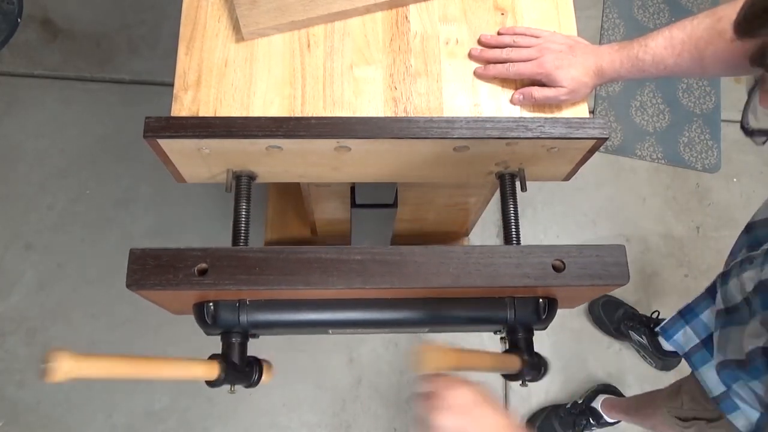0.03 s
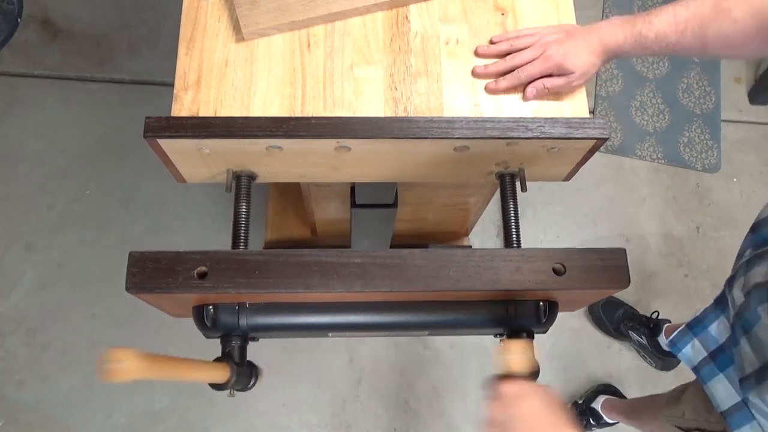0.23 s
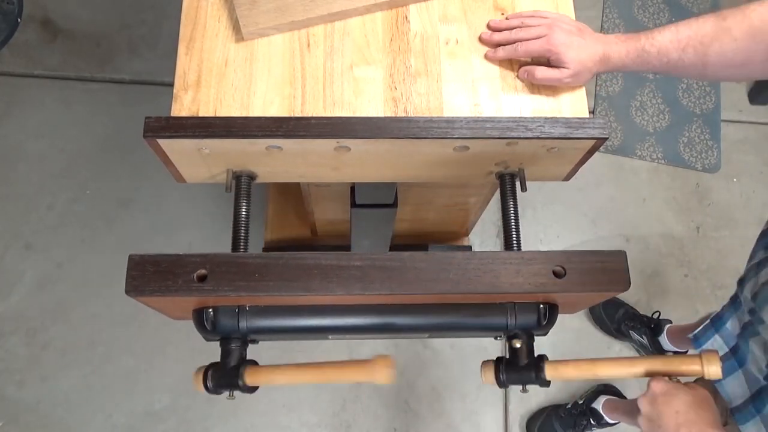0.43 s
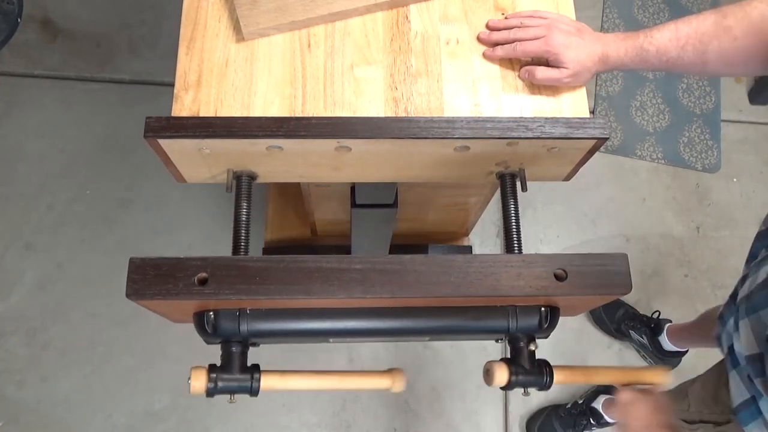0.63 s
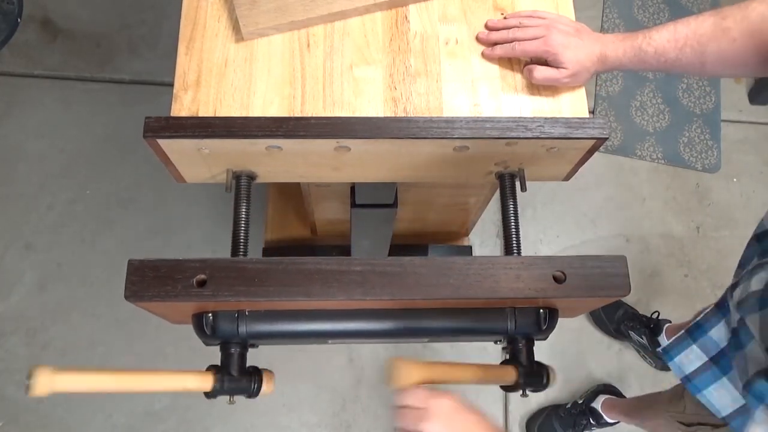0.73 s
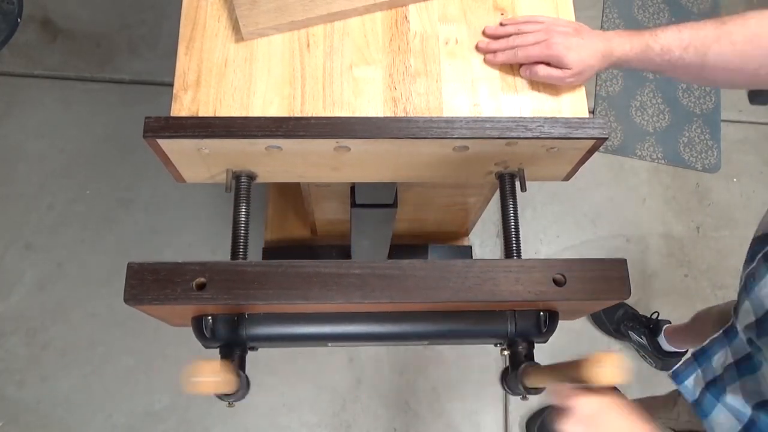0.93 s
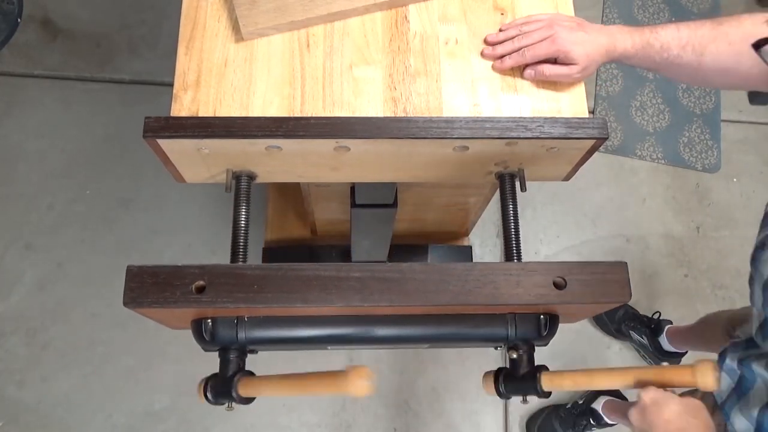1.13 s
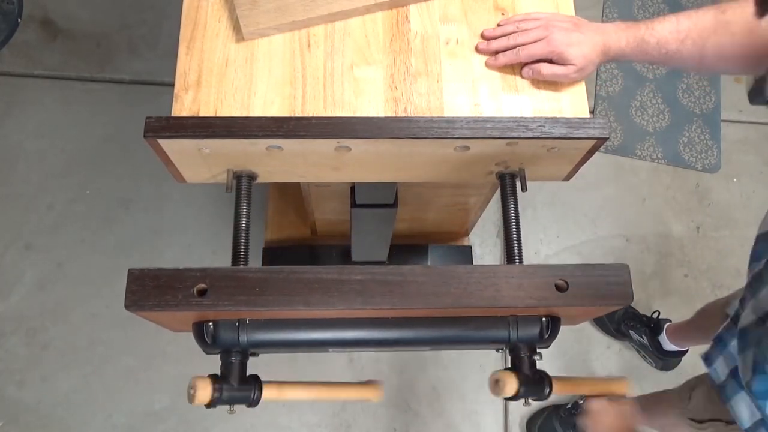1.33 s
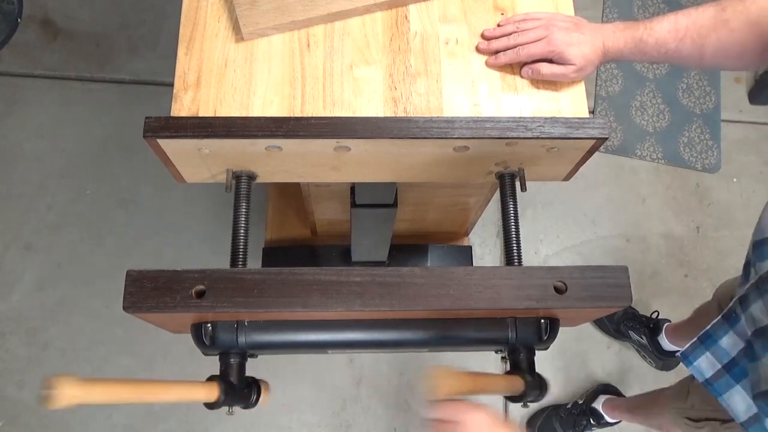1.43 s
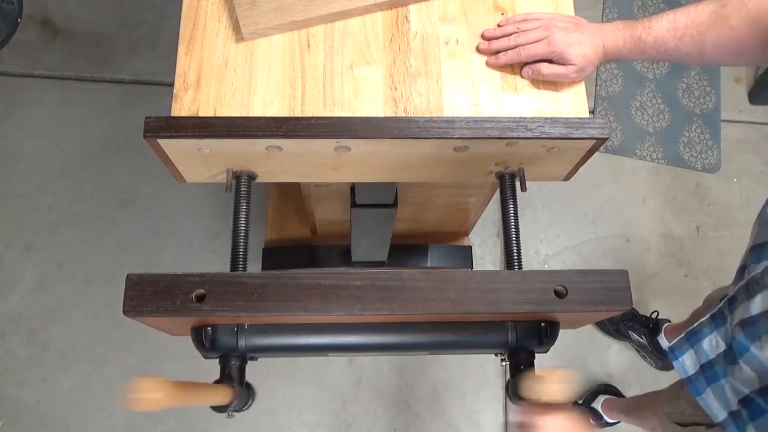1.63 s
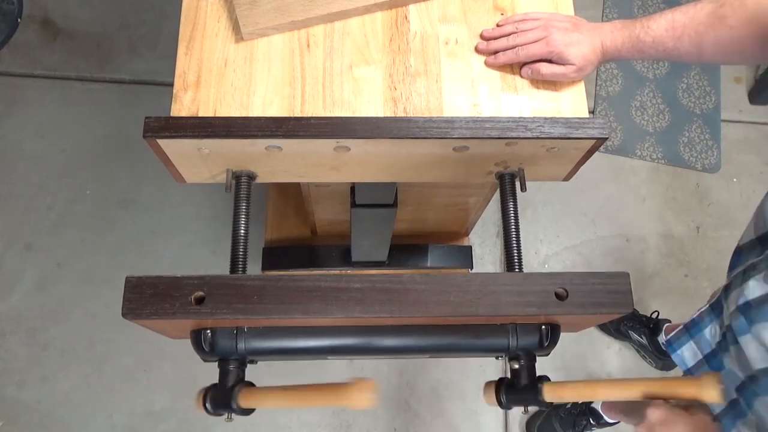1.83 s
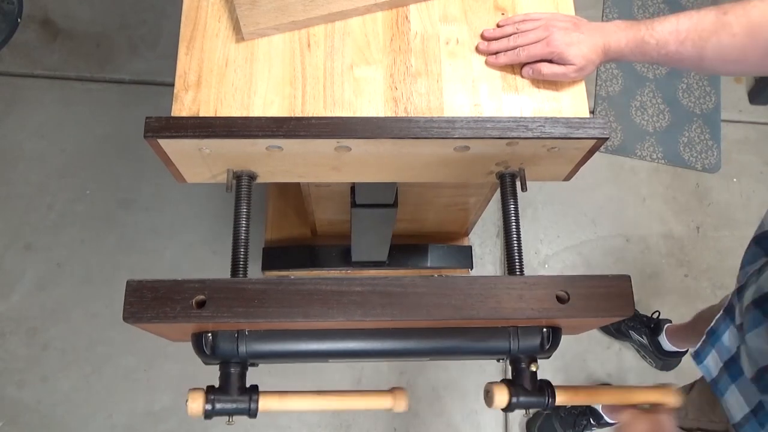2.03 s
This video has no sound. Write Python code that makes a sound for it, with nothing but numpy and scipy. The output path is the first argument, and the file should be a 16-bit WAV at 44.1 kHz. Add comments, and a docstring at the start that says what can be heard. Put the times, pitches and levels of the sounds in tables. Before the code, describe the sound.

A bench vise is cranked open by hand, screws rubbing, chain pattering, loose wooden handles knocking sharply

```python
"""Steel screws rub and a chain patters; dull bumps and small ticks join in, then loose handles knock sharply.
A twin-screw bench vise with wooden handles is cranked open by hand in a small workshop.
The rubbing is many tiny random slips plus ringing steel; some threads scrape briefly at their own pitch.
Knocks, bumps and ticks are short noise bursts, coloured by the parts that meet and reflected by the room.
Each knock also leaves a handle ringing: a sum of fading sine waves."""
import sys
import numpy as np
from scipy import signal
from scipy.fft import rfft, irfft, next_fast_len
from scipy.io import wavfile
from scipy.ndimage import uniform_filter1d, minimum_filter1d

SR = 44100
rng = np.random.default_rng(int(sys.argv[2]) if len(sys.argv) > 2 else 0)


def wav_out(sig):
    """Save sig, one row per channel (or a flat mono array), as 16-bit PCM at SR to the path in sys.argv[1]."""
    wavfile.write(sys.argv[1], SR, np.round(np.clip(np.atleast_2d(sig).T, -1, 1) * 32767).astype(np.int16))


N = 92610  # length in samples: 2.1 s

# A handle hits its socket. Levels are relative; treble_db applies above about 5 kHz:
# start_s, level_db, fullest_hz, treble_db, rebound_db, room_tail_db, handle (0 or 1)
HANDLE_HITS = [(0.2306, -0.8, 2950, -2, 1, -4.5, 0), (0.4286, -14.5, 2260, -3.5, -4, 2, 1),
               (1.1640, -12, 2740, -10, -2, -1.5, 0), (1.3079, -12, 2900, 12, -7.5, 1.5, 1),
               (1.5804, -10.5, 3200, -5, -11.5, 0, 1), (1.8031, -9.5, 3270, 0, -8.5, 0.5, 1)]
# How strongly chain steel sounds at each pitch: pitch_hz, level_db
CHAIN_TONE = [(300, -29), (2000, -5), (5500, 1), (7300, -5.5), (9200, 3), (11200, -6), (12800, 0),
              (15500, -1.5)]
# How strongly rubbing threads sound at each pitch: pitch_hz, level_db
RUB_TONE = [(30, -7), (140, -37.5), (215, -15), (450, -20.5), (630, -8.5), (880, -10.5), (1150, 5.5),
            (1550, -1), (2900, 1), (4800, -2), (7000, -10.5), (9500, -13), (11500, -16.5), (16000, -16)]
SLIPS_PER_S = 4000  # tiny slips of the threads


def from_db(db):
    """Turn decibels into a gain."""
    return 10 ** (np.asarray(db) / 20)


def rms_one(x):
    """Scale a sound to an average power of 1."""
    return x / np.sqrt(np.mean(x ** 2) + 1e-20)


def unit_energy(x):
    """Scale a short sound to an energy of 1."""
    return x / np.linalg.norm(x)


def level(rows):
    """Turn a curve of (time_s, level_db) into one gain per sample."""
    return from_db(np.interp(np.arange(N) / SR, *np.transpose(rows)))


def bell(f, hz, octaves):
    """A smooth hump around one pitch, 1 at its centre."""
    return np.exp(-.5 * (np.log2(f / hz) / octaves) ** 2)


def colour(x, points, extra=lambda hz: 0):
    """Filter along a (pitch_hz, level_db) curve plus an optional dB law, without any sound before the input."""
    n = 2 * next_fast_len(x.shape[-1])
    hz = np.maximum(np.arange(n // 2 + 1) * SR / n, 1)
    at, db = np.transpose(points)
    gain_db = np.interp(np.log(hz), np.log(at), db) + extra(hz)
    # folding the cepstrum (spectrum of the log gain) forward in time makes the filter minimum-phase
    cepstrum = irfft(np.log(from_db(gain_db)), n)
    cepstrum[1:n // 2] *= 2
    cepstrum[n // 2 + 1:] = 0
    filtered = irfft(rfft(x, n) * np.exp(rfft(cepstrum)), n)
    return filtered[..., :x.shape[-1]]


def burst(t60, rise_s, count=4):
    """Crowded vibration that swells and fades by 60 dB in about t60 seconds, with a nearly even spectrum."""
    t = np.arange(next_fast_len(int(t60 * SR) + 64)) / SR
    shape = from_db(-60 * t / t60) * (1 - np.exp(-t / rise_s)) ** 2
    x = rng.standard_normal(len(t)) * shape
    # in turn, flatten the spectrum and restore the swell and fade
    for _ in range(count):
        x = irfft(np.exp(1j * np.angle(rfft(x))), len(t))
        power = uniform_filter1d(x * x, int(t60 * SR / 10) + 2)
        x = x * shape / np.sqrt(np.abs(power) + 1e-14)
    return unit_energy(x)


def add(track, s, sound):
    """Mix a sound into a track at time s."""
    part = track[..., max(int(s * SR), 0):]
    part[..., :sound.shape[-1]] += sound[..., :part.shape[-1]]


def grains(per_s, spread_db):
    """Tiny impacts at random times, with uneven sizes and random signs."""
    sizes = from_db(spread_db * np.minimum(rng.exponential(1, N), 4))
    happens = rng.random(N) < per_s / SR
    return rms_one(happens * sizes * rng.choice([-1, 1], N))


def contact(x, points, extra=lambda hz: 0, size=4096):
    """A short excitation coloured by the part that it strikes, with room to ring out."""
    return unit_energy(colour(np.pad(x, (0, size)), points, extra))


def workshop(x, wet_db, side_db=0):
    """Direct sound, near reflections and a short, woody tail, as mid and side (centre and stereo difference)."""
    # near reflections from floor and bench, relative to wet_db: delay_s, level_db
    echoes = [(.0042, -10.5), (.009, -13.5), (0.0162, -15.5), (0.0218, -14)]
    warm_db, warm_hz, warm_octaves = 3.5, 2100, 0.33  # the wooden bench colours the reflections
    x = np.pad(x, (0, SR // 3))
    tail, side_tail = (from_db(wet_db) * burst(t60=.18, rise_s=0.0037) for _ in range(2))
    for s, db in echoes:
        add(tail, s, from_db([db + wet_db]))
    warmth = lambda f: warm_db * bell(f, warm_hz, warm_octaves)
    tail = colour(np.pad(tail, (0, SR // 50)), [(warm_hz, -2)], warmth)  # -2 dB at every pitch, plus the hump
    add(side_tail, 0, .5 * burst(t60=0.0027, rise_s=0.00033))
    mid, side = (signal.fftconvolve(x, h)[:len(x)] for h in (tail, side_tail))
    return np.array([x + mid, from_db(side_db) * side])


def stereo(mid, side):
    """A narrow stereo image: the side signal is filtered, then added left and subtracted right."""
    # how much of the side signal is kept at each pitch: pitch_hz, side_gain_db
    width = [(40, -15), (130, -36), (500, -28.5), (1200, -46.5), (2500, -19), (5000, -10), (10000, -13),
             (16000, -19.5)]
    return mid + colour(side, width) * np.array([[1], [-1]])


def room_floor():
    """Faint, mostly low noise of the quiet workshop."""
    noise = rng.standard_normal((2, N))
    rumble = colour(noise, [(25, 6), (100, 4), (250, -19), (1000, -26)])
    return from_db(-82.5) * rms_one(rumble)


def chain_rattle():
    """The running chain's fine patter: many small random impacts with the tone of the steel."""
    # relative strength of the running chain: time_s, level_db
    rattle_level = [(0, -39.5), (.07, -40), (.18, -45.5), (.31, -36), (.36, -51), (.5, -40.5), (.66, -44),
                    (.72, -46), (.97, -50), (1.1, -44), (1.22, -42), (1.36, -41.5), (1.47, -39),
                    (1.59, -48.5), (1.69, -38), (1.87, -46.5), (1.895, -32.5), (1.945, -36), (2.0, -55.5),
                    (2.1, -37.5)]
    impacts = grains(per_s=320, spread_db=5.0)
    patter = rms_one(colour(impacts, CHAIN_TONE)) * level(rattle_level)
    return from_db(-6) * workshop(patter, wet_db=6.0, side_db=2.0)[:, :N]


def screws():
    """Threads slip densely under uneven pressure, which gives a hiss; noise through resonances adds the ring."""
    # relative strength of the screw friction: time_s, level_db
    rub_level = [(0, -40), (.09, -37.5), (.145, -39.5), (.175, -40.5), (.36, -43), (.5, -40.5), (.66, -40),
                 (.83, -39), (.9, -42.5), (1.07, -42), (1.14, -38), (1.27, -42), (1.45, -41), (1.7, -39),
                 (1.79, -42.5), (1.91, -41), (2.02, -42.5), (2.1, -42)]
    # screw resonances: pitch_hz, width_hz, level_db
    screw_modes = [(1196, 72, -4.5), (1990, 160, -9), (2420, 9.6, 3), (2590, 15, -9), (2948, 30, 1.5),
                   (3330, 37, -9), (4665, 42, 0.5)]
    uneven_db, uneven_per_s = 0.5, 34
    knots = rng.standard_normal(1000)
    wander = np.interp(np.arange(N) / SR * uneven_per_s, np.arange(len(knots)), knots)
    pressure = from_db(uneven_db * wander)
    slips = np.array([grains(SLIPS_PER_S, spread_db=1.5) for _ in range(2)])
    hiss = from_db(-0.03) * rms_one(colour(slips, RUB_TONE))
    ring = np.zeros((2, N))
    for hz, width, db in screw_modes:
        resonance = signal.iirpeak(hz, hz / width, fs=SR)
        ring += from_db(db) * signal.lfilter(*resonance, rng.standard_normal((2, N)))
    return level(rub_level) * pressure * (hiss + from_db(-6.5) * rms_one(ring))


def thread_scrapes():
    """A thread catches and scrapes: short runs of slips swell and fade, each around its own pitch."""
    # start_s, length_s, level_db (relative), fullest_hz, width_octaves
    scrapes = [(0.067, 0.028, -42.5, 3200, 0.076), (0.089, 0.032, -43.5, 3900, 0.065),
               (0.118, 0.038, -41.5, 3180, 0.34), (0.141, .025, -47, 2500, 0.2),
               (.812, 0.037, -42.5, 2700, 0.52), (1.122, 0.034, -43, 2580, 1)]
    skirt_db = -16  # far from the fullest pitch
    out = np.zeros((2, N))
    for s, length, db, hz, octaves in scrapes:
        n = int(length * SR)
        slips = grains(SLIPS_PER_S, spread_db=3.0)[:n] * signal.windows.tukey(n, .5)
        scrape = contact(slips, RUB_TONE, lambda f: skirt_db * (1 - bell(f, hz, octaves)))
        # sqrt(n) makes the level independent of the length
        add(out, s, from_db(db) * np.sqrt(n) * workshop(scrape, wet_db=-10, side_db=4))
    return out


def chain_ticks():
    """A chain link snaps onto its sprocket: small steel clicks, each with its own brightest region."""
    # start_s, level_db (relative), brightest_hz, width_octaves
    ticks = [(0.05, -23, 14800, 0.39), (.2735, -18, 8000, 1.2), (0.2937, -10.5, 6170, 1.6),
             (.296, -14.5, 5330, .2), (0.38, -23.5, 10000, 1.1), (0.402, -19, 11900, 0.84),
             (.546, -14.5, 14000, 0.78), (.561, -11.5, 8400, 0.25), (0.644, -12.5, 12000, 0.72),
             (0.753, -24.5, 11900, 1), (.785, -21, 10000, 1.5), (1.026, -21.5, 8000, 1.1),
             (1.124, -23, 14500, 0.36), (1.136, -22, 14400, .3), (1.194, -23, 14000, .5),
             (1.199, -16.5, 13400, 0.93), (1.208, -20, 10900, 0.92), (1.225, -25, 11000, 0.4),
             (1.2559, -17.5, 11100, 0.26), (1.273, -22.5, 13000, 1.1), (1.285, -17, 13500, 0.71),
             (1.538, -22, 5900, 0.91), (1.713, -24, 8900, 0.64), (1.717, -18.5, 8400, 0.35),
             (1.885, -21, 13600, 0.4), (1.9, -26, 12100, 1.1), (2.027, -23.5, 14100, 1.2),
             (2.086, -25, 12700, .7), (2.091, -25, 14600, 0.62)]
    tick_db, skirt_db = 9, -16  # level of all ticks; cut far from the brightest pitch
    out = np.zeros((2, N))
    for s, db, hz, octaves in ticks:
        snap = burst(t60=0.014, rise_s=0.0004)
        tick = contact(snap, CHAIN_TONE, lambda f: skirt_db * (1 - bell(f, hz, octaves)))
        add(out, s, from_db(tick_db + db) * workshop(tick, wet_db=-2.1, side_db=4.5))
    return out


def handle_bumps():
    """The loose handle shifts dully in its socket: soft contacts, each with its own pitch."""
    # start_s, level_db (relative), fullest_hz
    bumps = [(0.0234, -16, 1300), (.046, -13.5, 1180), (.197, -14.5, 1240), (0.2613, -7, 1900),
             (0.285, -11.5, 1950), (1.666, -18.5, 1210), (1.694, -15, 1360), (1.889, -12, 1340),
             (1.892, -19.5, 2160), (1.912, -23, 1400)]
    # tone of a soft contact: pitch_hz, level_db
    bump_tone = [(40, -16), (140, -46), (230, -19), (450, -18.5), (850, -11.5), (1200, -1), (1700, -8.5),
                 (2600, -8.5), (5000, -11), (16000, -23)]
    bump_db, focus_db, focus_octaves = 6.5, 5.5, 0.34
    out = np.zeros((2, N))
    for s, db, hz in bumps:
        push = burst(t60=0.036, rise_s=0.0012)
        bump = contact(push, bump_tone, lambda f: focus_db * bell(f, hz, focus_octaves))
        add(out, s, from_db(bump_db + db) * workshop(bump, wet_db=-1.5))
    return out


def handle_ring():
    """The struck handle rings on after each knock, every vibration mode with a strength of its own."""
    # one list for each handle with its socket: pitch_hz, level_db (relative), t60_s (time to fade by 60 dB)
    handle_modes = [
        [(1150, 3.5, 0.27), (1414, -5, 0.29), (1698, 16, 0.12), (1760, 11, 0.22), (2150, 4.5, 0.21),
         (2404, 13.5, 0.17), (2742, 10, 0.13), (3450, 20.5, 0.044), (4655, 7.5, .14)],
        [(857, -0.5, .12), (1380, 7, .15), (1753, 10, .15), (1815, 4, 0.2), (2240, 11.5, 0.17), (2380, 9, 0.17),
         (2570, 14, 0.073), (2825, 14, 0.11), (3264, 13.5, 0.07), (3475, 18, .04)],
    ]
    ring_db, spread_db = -31.5, 1
    out, t = np.zeros(N), np.arange(SR // 2) / SR
    for s, db, *_, handle in HANDLE_HITS:
        hz, mode_db, t60 = np.transpose(handle_modes[int(handle)])[:, :, None]
        strength_db = mode_db + rng.normal(0, spread_db, hz.shape)
        phase = rng.random(hz.shape)
        modes = from_db(strength_db - 60 * t / t60) * np.sin(2 * np.pi * (hz * t + phase))
        soft_start = 1 - np.exp(-t / .002)
        add(out, s, from_db(ring_db + db) * modes.sum(0) * soft_start)
    return out


def handle_knocks():
    """Each drop of a handle is a hard hit followed at once by a duller rebound."""
    # tone of a hard hit: pitch_hz, level_db
    knock_tone = [(40, -46), (140, -51), (230, -32), (450, -31), (800, -14), (980, -14.5), (1130, -0.5),
                  (1400, 1.5), (1530, -3.5), (1750, 1.5), (3000, 0), (3500, 1), (3850, -4), (5000, -1),
                  (6200, -5.5), (8000, -13), (16000, -21.5)]
    knock_db, focus_db, focus_octaves = 12, 4.5, 0.32
    rebound_s, rebound_hz = 0.001903, 2130  # delay after the hit; the rebound is dull above this pitch
    out = np.zeros((2, N))
    for s, db, hz, treble_db, rebound_db, tail_db, _ in HANDLE_HITS:
        focus = lambda f: focus_db * (bell(f, hz, focus_octaves) - 1)
        hit_tone = lambda f: focus(f) + treble_db / (1 + (5000 / f) ** 4)
        dull = lambda f: -10 * np.log10(1 + (f / rebound_hz) ** 6)
        hit = contact(burst(t60=.0065, rise_s=0.00084), knock_tone, hit_tone)
        rebound = contact(burst(t60=0.0055, rise_s=0.00036), knock_tone, dull)
        hit_gain, rebound_gain = from_db(knock_db + db), from_db(knock_db + db + rebound_db)
        add(out, s, hit_gain * workshop(hit, tail_db, side_db=3.0))
        add(out, s + rebound_s, rebound_gain * workshop(rebound, tail_db, side_db=16))
    return out


def scene():
    """All parts of the vise in the room; the handle ring is added equally to left and right."""
    chain_and_screws = chain_rattle() + chain_ticks() + screws() + thread_scrapes()
    mid, side = room_floor() + chain_and_screws + handle_bumps() + handle_knocks()
    return stereo(mid, side) + handle_ring()


def record(dry):
    """A fast limiter turns down peaks above full scale; then the bass and the very top are cut."""
    n = int(.004 * SR)  # limiter window: 4 ms
    needed_gain = 1 / np.maximum(np.abs(dry).max(0), 1)
    gain = uniform_filter1d(minimum_filter1d(needed_gain, n), n)
    bass_cut = signal.butter(2, 120, "high", fs=SR, output="sos")
    top_cut = signal.cheby2(24, 60, 16200, fs=SR, output="sos")  # 60 dB down from 16.2 kHz
    return signal.sosfilt(top_cut, signal.sosfilt(bass_cut, dry * gain))


dry = scene()
out = record(dry)
wav_out(out)
```